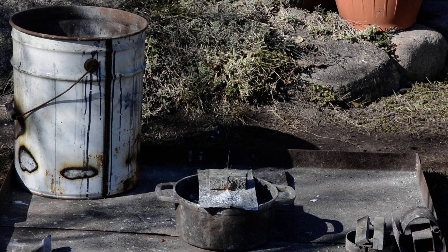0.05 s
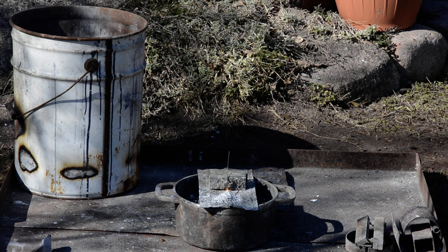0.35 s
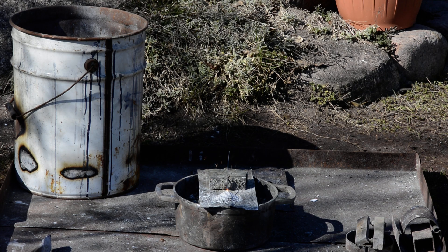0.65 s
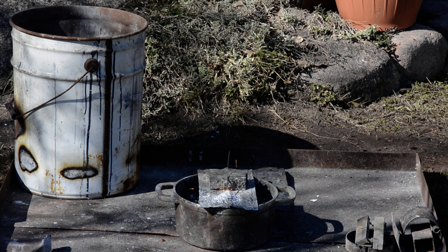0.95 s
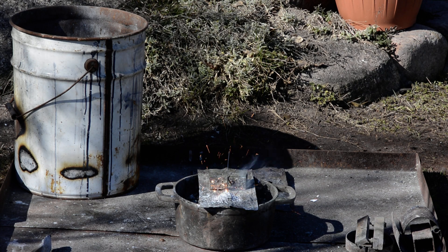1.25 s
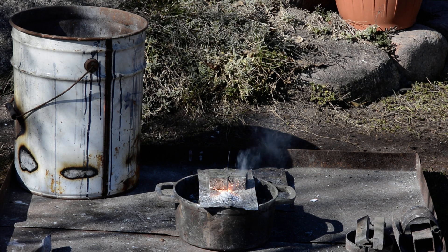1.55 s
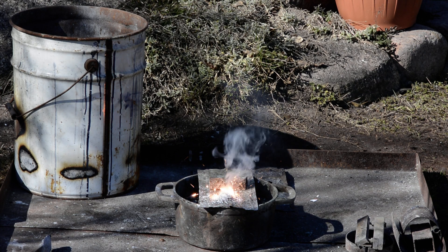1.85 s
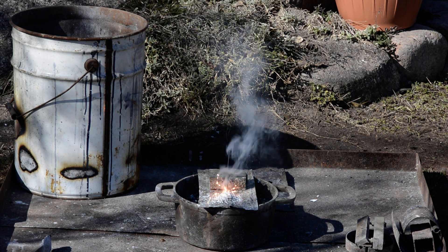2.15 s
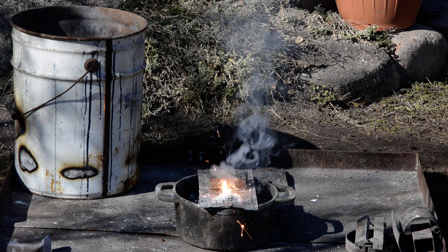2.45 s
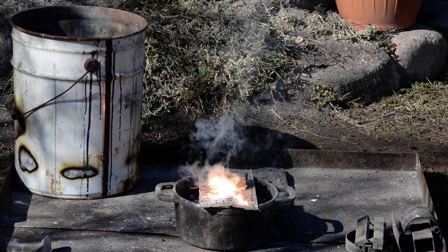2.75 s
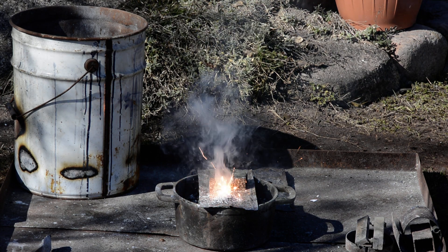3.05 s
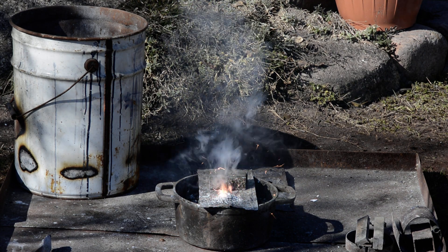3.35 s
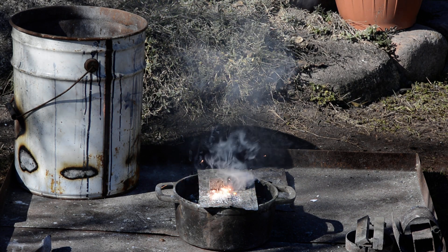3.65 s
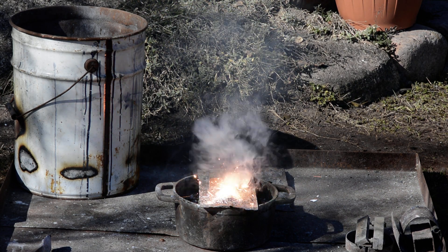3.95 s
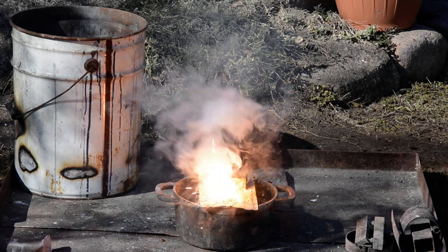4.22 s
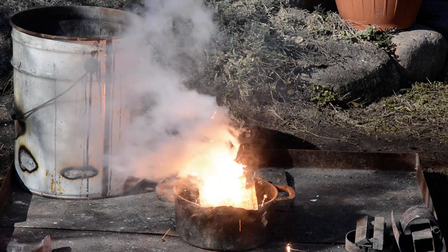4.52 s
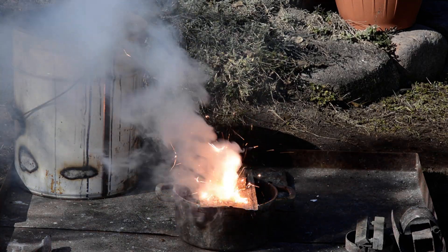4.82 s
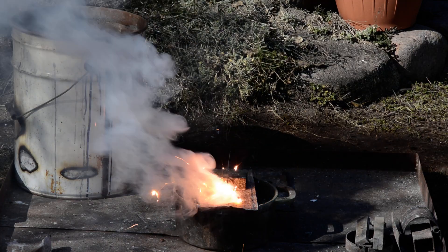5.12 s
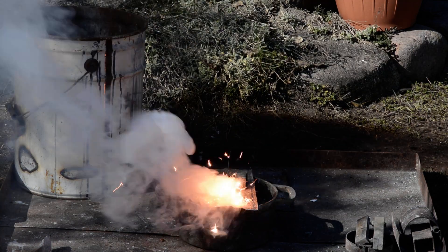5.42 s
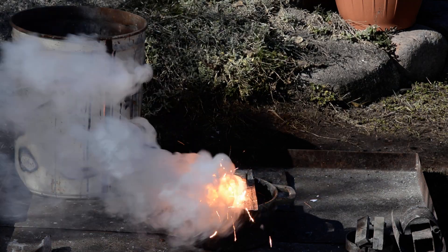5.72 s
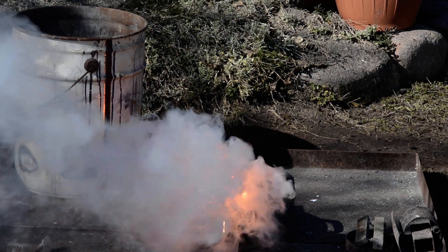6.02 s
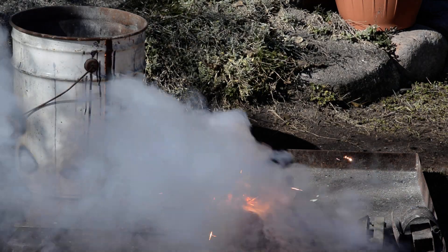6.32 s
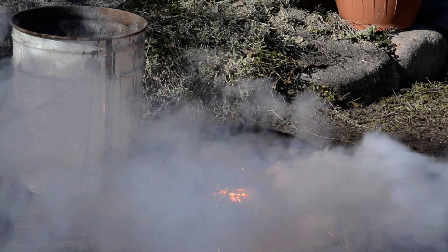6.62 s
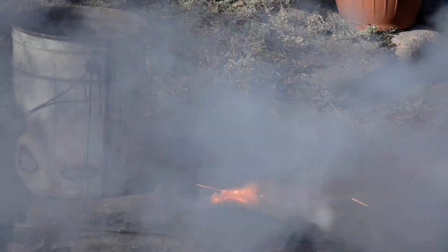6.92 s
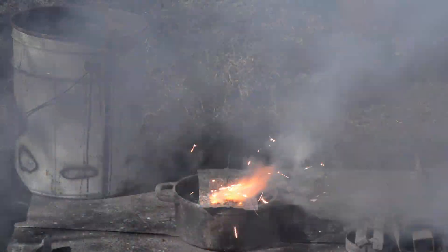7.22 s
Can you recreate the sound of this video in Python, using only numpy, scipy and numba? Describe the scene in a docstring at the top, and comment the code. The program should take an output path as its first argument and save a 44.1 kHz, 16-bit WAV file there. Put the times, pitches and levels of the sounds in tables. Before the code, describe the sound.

A burning chemical mixture spits, crackles and flares with a sputtering hiss outdoors, while wind gusts buffet the microphone early on.

```python
"""Chemical burn over an iron pot

Outdoors in a quiet garden, a stereo microphone faces a mixture on a metal sheet over an iron pot.
It spits, catches, sputters and flares: tiny gas bursts hiss and crackle, grains pop, the flame rushes.
The pot rings along and nearby surfaces scatter a short tail. Right at the microphone, gusts buffet
the two ports separately and die down as the flare peaks."""
import sys
import numpy as np
from scipy import signal
from scipy.fft import rfft, irfft
from scipy.io import wavfile
from scipy.ndimage import uniform_filter1d, map_coordinates
from numba import njit

SR = 44100
rng = np.random.default_rng(int(sys.argv[2]) if len(sys.argv) > 2 else 0)


def to_wav(s):
    """Save 16-bit WAV."""
    ch = np.atleast_2d(s).T  # columns
    pcm = np.round(np.clip(ch, -1, 1) * 32767)  # PCM
    wavfile.write(sys.argv[1], SR, pcm.astype(np.int16))


N = 320607
TIME = np.arange(N) / SR

# Levels in the tables are relative; each layer sets its own gain.
# still garden air: f/Hz, level/dB
AIR_SPECTRUM = [(40, 3), (150, 1), (400, 11.5), (800, 12), (1300, 5), (2100, 7), (3500, 1.5), (6000, -3),
                (10000, -4), (15500, -11)]
# breeze on the microphone between gusts: t/s, left level/dB, right level/dB
BREEZE_LEVELS = [(0, -41, -47), (.15, -38, -44.5), (.6, -30, -32.5), (.85, -35, -34), (.98, -55, -48.5),
                 (1.2, -48, -41.5), (1.3, -43, -30.5), (1.9, -50, -37), (2.75, -27.5, -33), (3.3, -38, -37),
                 (3.42, -36, -34), (3.55, -39, -32), (3.8, -21.5, -25), (3.9, -40, -39.5), (4.17, -73, -73),
                 (7.27, -60, -58)]
# gusts on the microphone: t/s, length/s, left level/dB, right level/dB
WIND_GUSTS = [(0.075, 0.093, -34, -42), (.385, .12, -20, -33.5), (.61, 0.15, -33, -28),
              (0.763, 0.051, -29, -30), (1.031, 0.085, -48, -35), (1.241, 0.033, -28.5, -23),
              (1.331, 0.027, -27, -24), (1.589, 0.041, -26.5, -23.5), (1.679, 0.042, -28, -39),
              (1.754, 0.1, -47, -34.5), (1.91, 0.039, -50, -29.5), (2.007, 0.067, -30.5, -26.5),
              (2.192, .16, -35.5, -24), (2.44, 0.032, -17, -30), (2.513, 0.055, -27, -26),
              (2.653, 0.08, -24.5, -26), (2.839, 0.037, -22.5, -25), (2.931, 0.053, -19, -19.5),
              (3.049, 0.02, -18.5, -25), (3.146, 0.083, -20.5, -26), (3.247, 0.034, -15, -18),
              (3.476, 0.058, -23.5, -37), (3.54, 0.081, -25, -21.5), (3.641, 0.067, -18.5, -18.5),
              (3.922, 0.076, -46, -37.5), (4.919, 0.13, -47, -45), (5.096, .06, -34.5, -43),
              (5.301, .19, -37.5, -40), (6.053, 0.1, -41, -38), (6.21, 0.052, -44, -38.5),
              (6.65, 0.046, -40, -50), (6.82, 0.037, -49, -39), (6.988, .025, -53, -42)]
# strong eddies that thump one port: t/s, level/dB, f/Hz, port (0 left, 1 right)
PORT_EDDIES = [(.1, -18, 280, 0), (0.41, -3, 404, 0), (0.42, -1, 410, 0), (.43, -2, 423, 0),
               (.476, -6, 424, 0), (.508, -3.5, 790, 0), (.537, -6.5, 560, 0), (.547, -5, 463, 0),
               (.583, -21, 590, 0), (0.781, -5.5, 204, 1), (2.937, -3.5, 377, 0), (2.958, -4, 417, 0),
               (2.979, 0.5, 340, 0), (3.218, -2, 312, 1), (3.280, 2.5, 730, 0), (3.289, 2.5, 504, 0),
               (3.294, 0, 645, 0), (3.466, -6, 563, 0), (3.576, -3, 277, 1), (3.616, -1, 415, 0),
               (3.654, 0.5, 413, 0), (3.691, 5.5, 573, 0), (3.705, -1.5, 750, 1), (6.229, -15, 150, 1)]
# faint falling whistles: t/s, length/s, start f/Hz, end f/Hz, level/dB
WHISTLE_GLIDES = [(0.647, .09, 3570, 2940, -58), (0.871, .09, 1550, 1050, -52)]
# air resonances of pot and sheet: f/Hz, width/Hz, level/dB re the direct sound
POT_MODES = [(530, 170, -5), (1073, 11, 3), (1610, 37, -14), (1955, 230, -7), (2363, 225, 1),
             (2980, 110, -12), (8300, 830, -17.5)]
# crackle that differs between the ports: f/Hz, level/dB
SIDE_SPECTRUM = [(200, -21), (700, -6), (1500, -39), (2400, -0.5), (3600, -21), (5400, -6.5), (12000, 2.5),
                 (15500, 2.5)]
# short jets of gas: t/s, level/dB, length/s
GAS_JETS = [(0.719, -35, 0.021), (0.742, -32.5, 0.016), (0.766, -34.5, 0.0062), (.802, -39, 0.01),
            (.835, -35, 0.031), (0.865, -39, 0.044), (0.958, -42, 0.0084), (0.974, -39.5, 0.025),
            (1.04, -35.5, 0.0061), (1.100, -39, .005), (1.156, -39, 0.015), (1.461, -30.5, 0.0053),
            (1.493, -31, 0.0091), (3.428, -34.5, 0.0062), (5.322, -28, 0.0021), (5.597, -27, 0.0037),
            (5.693, -25.5, 0.0038)]
# gas pockets opening in the melt: t/s, level/dB
MELT_PLOPS = [(5.165, -27), (5.79, -27.5), (5.858, -33), (5.919, -28.5), (6.829, -28.5), (7.018, -31.5),
              (7.081, -29)]
# bursting grains: t/s, level/dB
GRAIN_POPS = [(1.182, -14), (1.237, -13), (1.287, -9), (1.37, -7), (1.576, -11), (1.720, -8.5), (2.016, -8),
              (2.409, -5), (2.443, -10), (2.55, -5), (2.740, -4.5), (2.841, -2), (3.106, -6), (3.277, -1.5),
              (3.666, -4.5), (3.677, -4), (3.757, -9), (4.254, -6), (4.494, -2), (4.944, -4), (5.046, -11),
              (5.165, -3.5), (5.324, -10), (5.419, -6), (5.791, -13), (6.081, -11), (6.214, -9),
              (6.453, -9), (6.734, -7), (7.018, -10), (7.103, -10), (7.202, -3), (7.23, -3)]
# steady burn that creeps, flares, sinks and revives: t/s, fizz level/dB, rush level/dB
BURN_LEVELS = [(1.16, -37.5, -37.5), (1.64, -40, -38.5), (1.8, -33.5, -36), (2.06, -36.5, -35),
               (2.4, -31, -31.5), (2.66, -34.5, -36), (3.3, -33.5, -36), (3.87, -34, -36),
               (4.3, -29.5, -26.5), (4.85, -27, -29.5), (5.12, -34.5, -33), (5.62, -30, -33.5),
               (5.99, -37.5, -37.5), (6.2, -35.5, -36), (6.78, -35.5, -35.5), (6.96, -44.5, -43),
               (7.08, -34, -36), (7.27, -31.5, -33)]
# flare-ups as fresh mixture catches: t/s, length/s, fizz level/dB, rush level/dB
FLARE_UPS = [(1.17, .015, -38, -33), (1.227, 0.03, -35, -24.5), (1.265, 0.018, -43, -39),
             (1.323, 0.036, -44, -44), (1.486, 0.091, -38, -35), (1.701, 0.012, -35, -41.5),
             (1.763, 0.037, -36, -26), (1.867, 0.049, -34, -30.5), (2.222, 0.084, -35, -29.5),
             (2.333, 0.023, -31.5, -31), (2.435, 0.013, -34, -24), (2.526, 0.042, -27, -27.5),
             (2.693, 0.041, -40, -30.5), (2.793, .02, -28, -29), (2.865, 0.053, -28, -30.5),
             (3.04, 0.063, -31.5, -32), (3.34, 0.014, -35, -34.5), (3.534, 0.011, -35, -44),
             (3.606, 0.017, -29, -33), (3.727, 0.034, -29, -31), (3.894, 0.18, -33.5, -31.5),
             (5.208, 0.1, -33.5, -34), (5.315, 0.043, -28.5, -35), (5.777, 0.098, -36, -36),
             (6.045, .07, -36, -39), (6.674, .06, -41, -37.5), (7.187, 0.087, -29, -32.5)]
# brief chokes of the burn: t/s, length/s, level change/dB
BURN_STALLS = [(1.394, 0.085, -12), (2.595, 0.04, -4.5), (2.753, 0.022, 2), (3.145, 0.033, -3),
               (3.395, 0.034, -8), (3.458, 0.075, -9), (3.713, 0.011, -9), (5.118, 0.056, -1.5)]
# texture of the burn: t/s, gas bursts/(1/s), sputter depth/dB, burble level/dB re the rush
BURN_TEXTURE = [(1.2, 1530, 6.5, -22), (1.8, 1600, 3.5, -16.5), (2.6, 2170, 2, -20),
                (3.6, 1900, 2.4, -13.5), (4.1, 5500, 1.4, -12.5), (4.8, 5000, 1.3, -11.5),
                (5.3, 2640, 1.5, -7.5), (5.85, 2800, 1, -7), (6.4, 3200, 0.7, -5.5), (6.9, 2200, 2, -5.5),
                (7.25, 1900, 3, -8)]
# one gas burst: f/Hz, level/dB
FIZZ_SPECTRUM = [(150, -37), (500, -17.5), (1000, -0.5), (1300, -6.5), (1700, 5.5), (2400, -1.5),
                 (3500, 0.5), (5800, -2), (8400, 1.5), (11000, 1), (15500, 1.5)]
# rush of the flame: f/Hz, level/dB
RUSH_SPECTRUM = [(50, -35), (130, -22), (250, -14.5), (350, -14.5), (650, -17.5), (780, -32), (1300, -8.5),
                 (1600, -4), (2400, -5), (3400, -4.5), (4500, -8.5), (8000, -14)]
# low, hollow burble: f/Hz, level/dB
BURBLE_SPECTRUM = [(60, -26.5), (220, -11), (350, -18.5), (450, -2), (600, -3), (780, -9), (1050, -4.5),
                   (1500, -19.5), (2500, -17), (6000, -23)]


def undb(db):
    """Decibels to gain."""
    return 10 ** (np.asarray(db) / 20)


def unit(x):
    """Scale to rms 1."""
    return x / np.sqrt(np.mean(x ** 2))


def curves(table):
    """Each column of a timed table, sample by sample."""
    times, *columns = np.transpose(table)
    return [np.interp(TIME, times, column) for column in columns]


def wander(hz):
    """A smooth random drift of rms 1."""
    knots = rng.standard_normal(N // 4)[:int(N * hz / SR) + 4]
    return unit(map_coordinates(knots, [TIME * hz], order=2, mode="nearest"))


def colour(x, spectrum, size=1024):
    """Shape each row of x with a minimum-phase filter of unit power."""
    hz, db = np.transpose(spectrum)
    log_hz = np.log(np.fft.rfftfreq(size, 1 / SR) + 1)
    cepstrum = irfft(np.log(undb(np.interp(log_hz, np.log(hz), db))))
    cepstrum[1:size // 2] *= 2
    cepstrum[size // 2 + 1:] = 0
    response = irfft(np.exp(rfft(cepstrum)))
    return signal.fftconvolve(x, response[None] / np.linalg.norm(response))[:, :N]


@njit
def lowpass(x, hz, damping):
    """State-variable low-pass with a moving corner."""
    low, band_state, low_state = np.empty(len(x)), 0., 0.
    for i in range(len(x)):
        g = np.tan(np.pi * hz[i] / SR)
        band = (band_state + g * (x[i] - low_state)) / (1 + g * (g + damping))
        low[i] = low_state + g * band
        band_state, low_state = 2 * band - band_state, 2 * low[i] - low_state
    return low


def flutter(db, size=4400):
    """A fluttering gain that keeps the mean power steady."""
    return undb(db) / np.sqrt(uniform_filter1d(undb(2 * db), size=size))


def swell(start, length, attack_s, release_s):
    """An envelope that rises, holds and dies away."""
    out, t = np.zeros(N), np.arange(int((length + 10 * release_s) * SR)) / SR
    envelope = np.minimum(t / attack_s, 1) * np.exp(-np.maximum(t - length, 0) / release_s)
    part = out[int(start * SR):][:len(t)]
    part[:] = envelope[:len(part)]
    return out


def surges(steady, events, attack_s, release_s):
    """Two steady level curves as gains, with the power of each event's swell added."""
    power = undb(curves(steady)) ** 2
    for start, length, *db in events:
        power += (undb(db)[:, None] * swell(start, length, attack_s, release_s)) ** 2
    return np.sqrt(power)


def background(air_db=-54, width=0.5, hiss_db=-61, whine_hz=15692, whine_db=-63):
    """Garden air all around, the microphone's own hiss and a thin electronic whine."""
    air = rng.standard_normal(N) + width * rng.standard_normal((2, N))
    hiss = undb(hiss_db) * rng.standard_normal((2, N))
    whine = undb(whine_db) * np.sin(2 * np.pi * whine_hz * TIME)
    return undb(air_db) * unit(colour(air, AIR_SPECTRUM)) + hiss + whine


def wind(centre_hz=225, rise_per_db=0.041, eddy_db=4.5, eddy_hz=75):
    """Turbulence right at each port: the harder an eddy blows, the higher its rumble sits."""
    ports = []
    for strength in surges(BREEZE_LEVELS, WIND_GUSTS, attack_s=0.013, release_s=0.027):
        blow = strength * flutter(eddy_db * wander(eddy_hz), size=3000)
        blow_db = 20 * np.log10(blow)
        centre = np.clip(centre_hz * np.exp(rise_per_db * (blow_db + 30)), 120, 700)
        # the slope of low-passed noise is a band around the centre; small eddies fade fast above it
        band = np.gradient(lowpass(rng.standard_normal(N), centre, damping=1.14))
        rumble = lowpass(band / centre, 1.11 * centre, damping=np.sqrt(2))
        ports.append(blow * rumble / np.sqrt(uniform_filter1d(rumble ** 2, size=1500)))
    return np.array(ports)


def buffets(gain_db=-2, size=1024):
    """A strong eddy crosses one port as one or two swings of pressure."""
    out, t = np.zeros((2, N)), (np.arange(size) - size / 2) / SR
    for at, db, hz, port in PORT_EDDIES:
        swing = np.sin(2 * np.pi * (hz * t + rng.random())) / np.cosh(np.pi * hz * t)
        out[int(port), int(at * SR) - size // 2:][:size] += undb(db + gain_db) * swing
    return out


def whistles(waver_hz=200):
    """Faint, rough tones that slide down, centred between the ports."""
    out = np.zeros(N)
    for start, length, start_hz, end_hz, db in WHISTLE_GLIDES:
        progress = np.clip((TIME - start) / length, 0, 1)
        hz = start_hz + (end_hz - start_hz) * progress + waver_hz * wander(hz=600)
        tone = unit(np.sin(2 * np.pi * np.cumsum(hz) / SR))
        out += undb(db) * np.sin(np.pi * progress) * tone
    return out


def pot_and_garden(direct, tail_db=-19, tail_s=0.04, side_db=-13, right_treble=0.19, size=4096):
    """On the way to the microphone the pot rings and nearby stones and bushes scatter a short tail."""
    rung = direct + sum(undb(db) * signal.lfilter(*signal.iirpeak(hz, hz / width, SR), direct)
                        for hz, width, db in POT_MODES)
    tail = rng.standard_normal(size) * np.exp(-np.arange(size) / SR / tail_s)
    mid = rung + undb(tail_db) * signal.fftconvolve(rung, tail / np.linalg.norm(tail))[:N]
    # every burst comes from a different spot, so each has its own balance between the ports
    side = undb(side_db) * colour((direct * rng.standard_normal(N))[None], SIDE_SPECTRUM)[0]
    # the right port hears a little more of the top treble
    side -= right_treble * signal.filtfilt(*signal.butter(1, 12000, "high", fs=SR), mid)
    return np.array([mid + side, mid - side])


def sparks(per_s=30, over_db=20, scatter_db=0.5):
    """Lone dry ticks of flying sparks, relative to the fizz."""
    ticks = rng.random(N) < per_s / SR
    return ticks * undb(over_db + scatter_db * np.clip(rng.standard_normal(N), -2, 2))


def plops(fade_s=0.003, size=1024):
    """A pocket of gas in the melt opens with a short gulp."""
    out, t = np.zeros(N), np.arange(size) / SR
    for start, db in MELT_PLOPS:
        out[int(start * SR):][:size] += undb(db) * rng.standard_normal(size) * np.exp(-t / fade_s)
    return out


def spits(gain_db=-3, tail_s=0.0022):
    """Strength of the gas jets: each starts at once, holds briefly and dies."""
    out = np.zeros(N)
    for start, db, length in GAS_JETS:
        t = np.arange(int((length + 10 * tail_s) * SR)) / SR
        envelope = np.exp(-np.maximum(t - length, 0) / tail_s)
        out[int(start * SR):][:len(t)] += undb(db + gain_db) * envelope
    return out


def pops(gain_db=-3.5, puff_db=-14.5, puff_s=0.0016, size=512):
    """Each grain cracks open and lets out a short puff."""
    out, t = np.zeros(N), np.arange(size) / SR
    for start, db in GRAIN_POPS:
        pop = undb(puff_db) * rng.standard_normal(size) * np.exp(-t / puff_s)
        pop[0] = 1  # the crack
        out[int(start * SR):][:size] += undb(db + gain_db) * pop
    return out


def outbreaks(per_s, fade_s):
    """Gas breaks out at random moments and fades: a control curve of mean 0 and rms 1."""
    kicks = (rng.random(N) < per_s / SR) * rng.random(N)
    power = signal.lfilter([1], [1, -np.exp(-1 / (SR * fade_s))], kicks + 1e-18)
    strength = np.sqrt(np.maximum(power, 0))
    return unit(strength - strength.mean())


def gas_bursts(per_s, scatter_db, bed_gain):
    """Tiny clicks of uneven size over a bed of escaping gas; rms 1."""
    chance = np.clip(per_s / SR, 0, 1)
    sizes = undb(scatter_db * np.minimum(rng.exponential(size=N), 4))
    clicks = (rng.random(N) < chance) * sizes * rng.choice([-1, 1], N) / np.sqrt(chance)
    return unit(unit(clicks) + bed_gain * rng.standard_normal(N))


def burn_strength(attack_s=0.007, release_s=0.027):
    """Gains of fizz and rush: the mixture catches, flare-ups feed it and stalls choke it."""
    alight = np.clip((TIME - BURN_LEVELS[0][0]) / attack_s, 0, 1)
    choke_db = sum(db * swell(start, length, attack_s=0.022, release_s=0.0049)
                   for start, length, db in BURN_STALLS)
    return alight * undb(choke_db) * surges(BURN_LEVELS, FLARE_UPS, attack_s, release_s)


def fire(fizz_db=0.03, rush_db=-4.5, rush_sputter=0.76, burble_flutter_db=2):
    """At the sheet: fizz, flame rush and low burble, all shaken by the uneven advance of the burn."""
    fizz_gain, rush_gain = burn_strength()
    per_s, sputter_db, burble_db = curves(BURN_TEXTURE)
    shake_db = sputter_db * unit(outbreaks(per_s=280, fade_s=0.0024) + 0.45 * wander(hz=45))
    jets, cracks, gulps = spits(), pops(), plops()
    gas = fizz_gain * undb(fizz_db)
    flame = rush_gain * undb(rush_db) * flutter(rush_sputter * shake_db)
    fizz = (gas * flutter(shake_db) + jets) * gas_bursts(per_s, scatter_db=3, bed_gain=0.65)
    fizz += gas * sparks()
    rush = (flame + undb(-9.5) * jets) * gas_bursts(per_s, scatter_db=6, bed_gain=0.68)
    wobble_db = burble_flutter_db * outbreaks(per_s=60, fade_s=0.004)
    burble = flame * undb(burble_db + wobble_db) * rng.standard_normal(N)
    layers = [(fizz + cracks, FIZZ_SPECTRUM),
              (rush + undb(-10) * cracks, RUSH_SPECTRUM),
              (burble + gulps, BURBLE_SPECTRUM)]
    return sum(colour(layer[None], spectrum)[0] for layer, spectrum in layers)


def scene():
    """Fire, wind and garden as they reach the two microphone ports."""
    return pot_and_garden(fire()) + wind() + buffets() + whistles() + background()


def record(dry, low_cut_hz=52, top_hz=15880):
    """The recorder cuts the deepest rumble, clips at full scale and cuts the top treble."""
    low_cut = signal.lfilter(*signal.butter(3, low_cut_hz, "high", fs=SR), dry)
    clipped = np.clip(low_cut, -1, 1)
    return signal.sosfilt(signal.ellip(12, 0.2, 90, top_hz, fs=SR, output="sos"), clipped)


dry = scene()
out = record(dry)
to_wav(out)
```